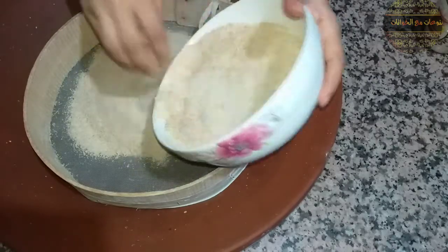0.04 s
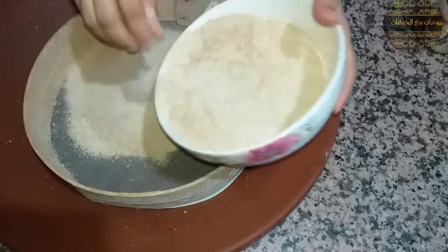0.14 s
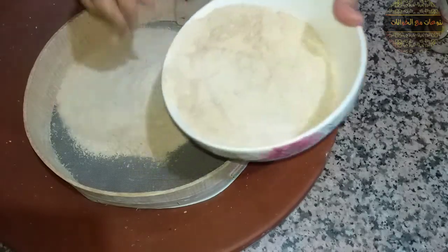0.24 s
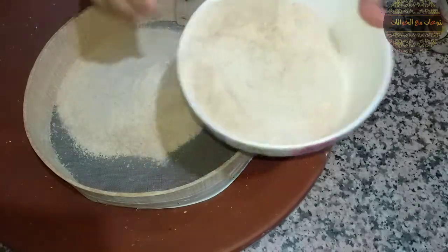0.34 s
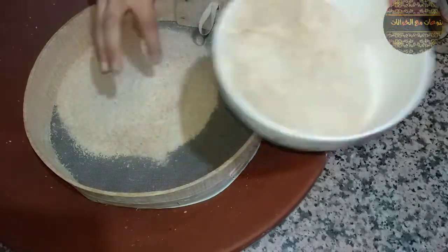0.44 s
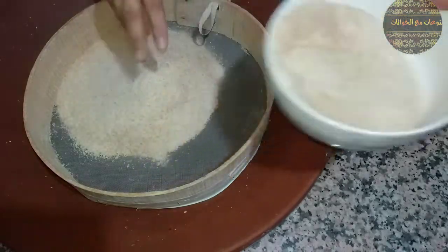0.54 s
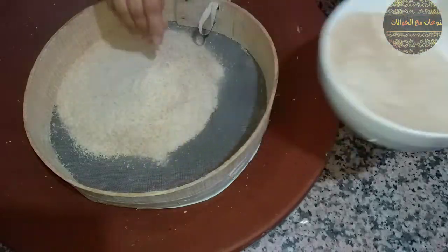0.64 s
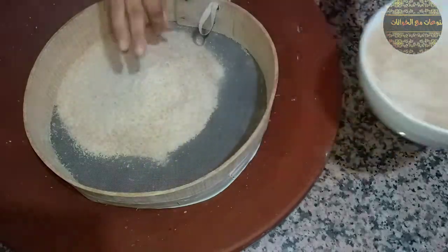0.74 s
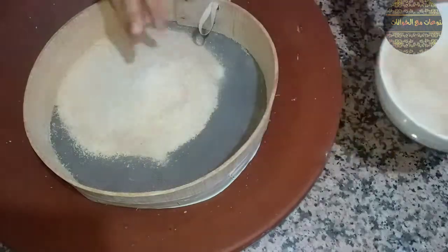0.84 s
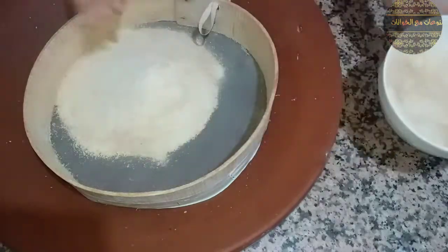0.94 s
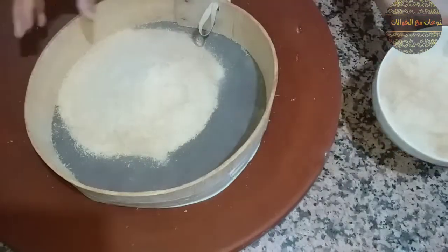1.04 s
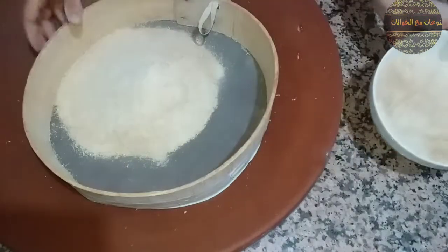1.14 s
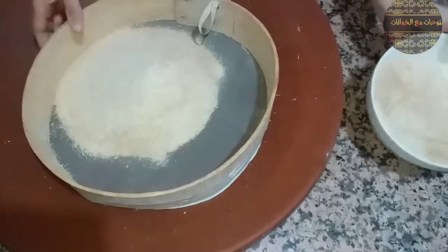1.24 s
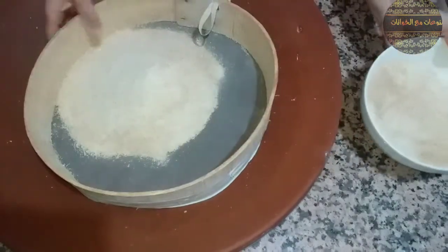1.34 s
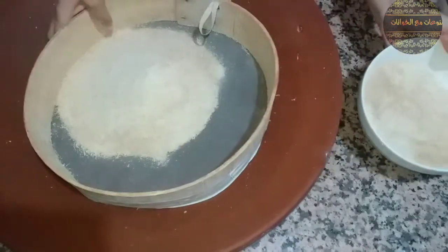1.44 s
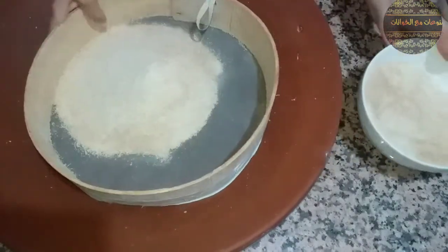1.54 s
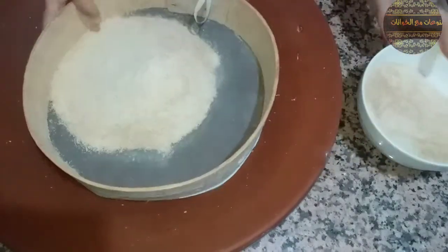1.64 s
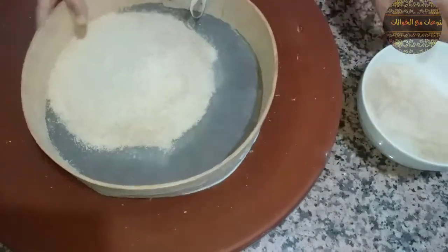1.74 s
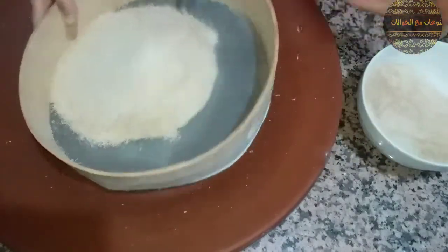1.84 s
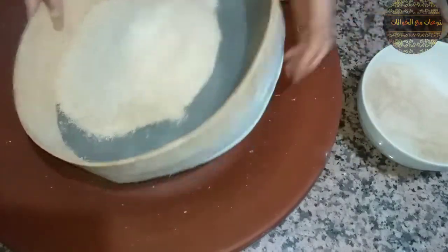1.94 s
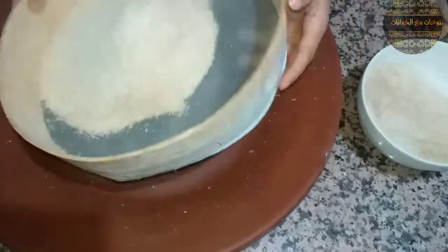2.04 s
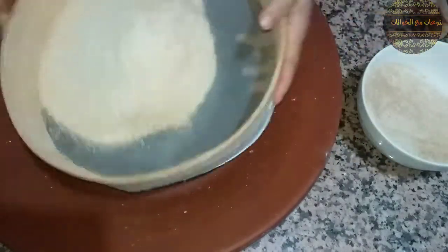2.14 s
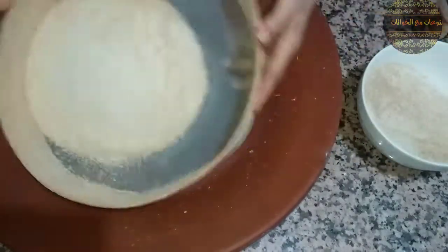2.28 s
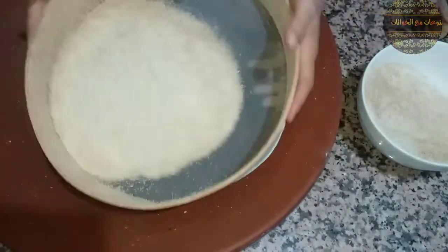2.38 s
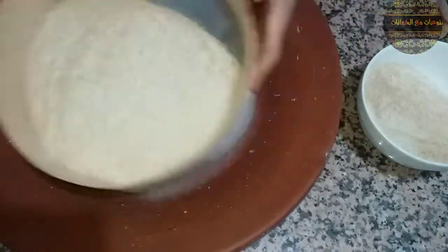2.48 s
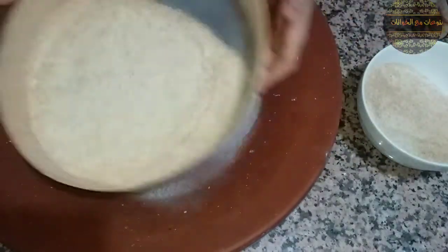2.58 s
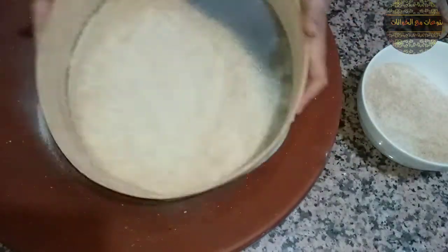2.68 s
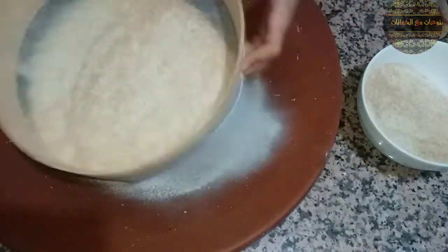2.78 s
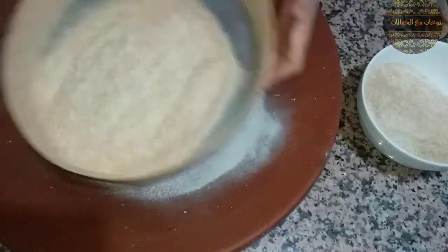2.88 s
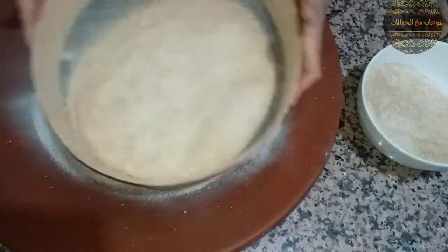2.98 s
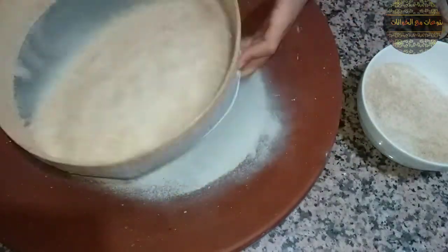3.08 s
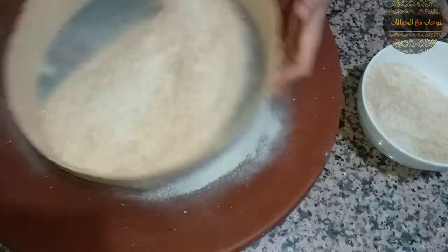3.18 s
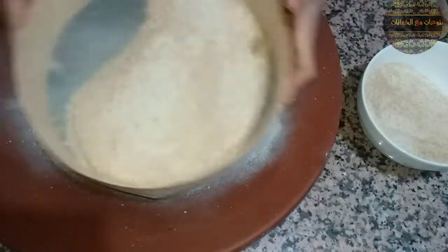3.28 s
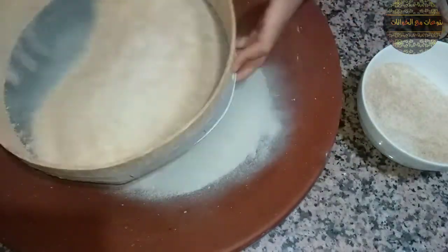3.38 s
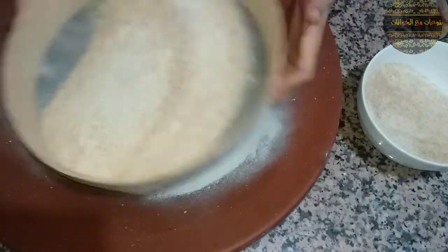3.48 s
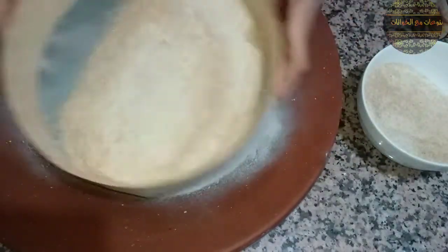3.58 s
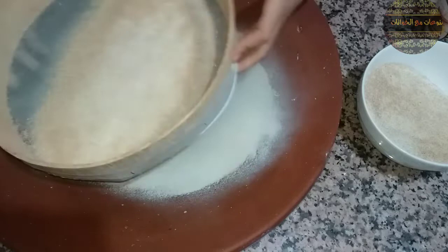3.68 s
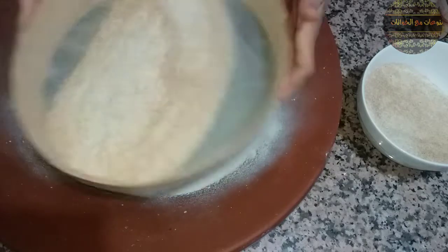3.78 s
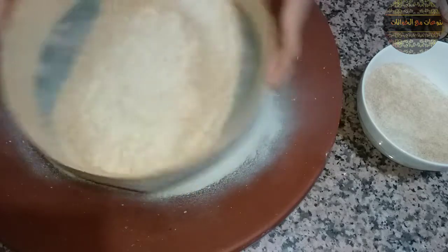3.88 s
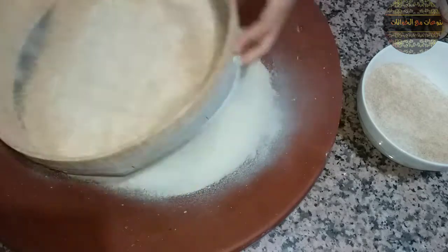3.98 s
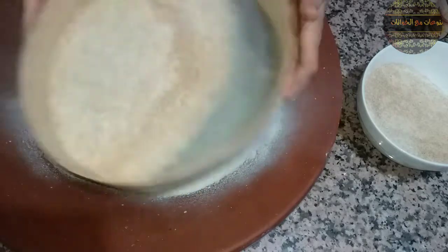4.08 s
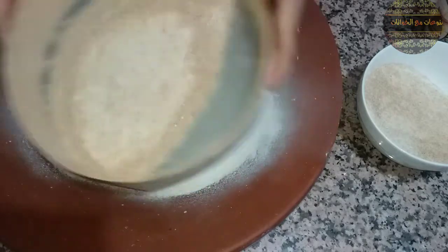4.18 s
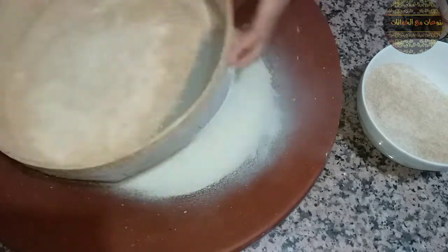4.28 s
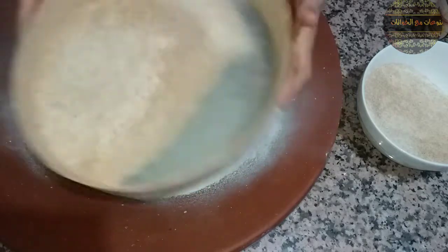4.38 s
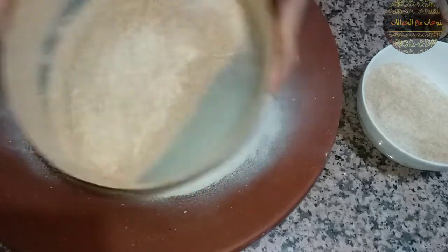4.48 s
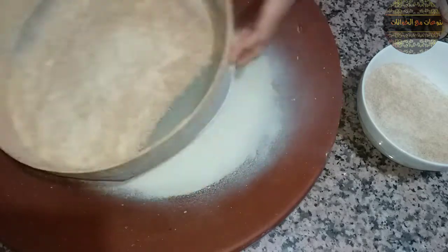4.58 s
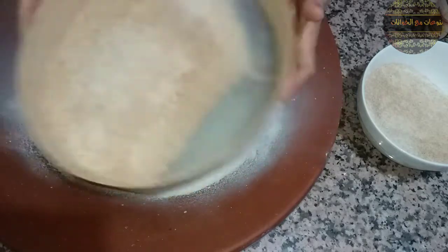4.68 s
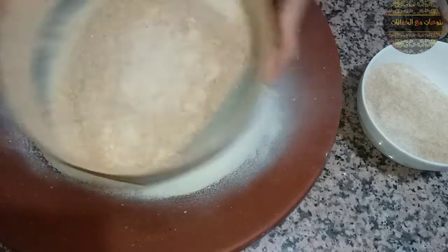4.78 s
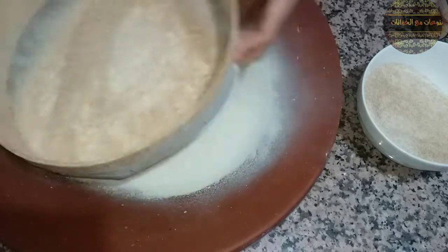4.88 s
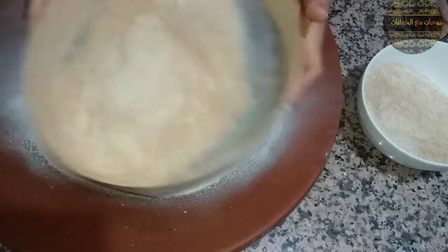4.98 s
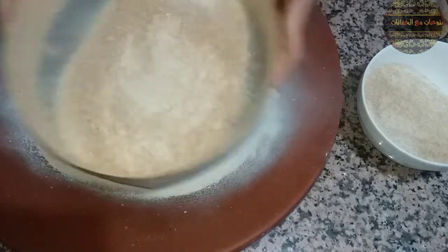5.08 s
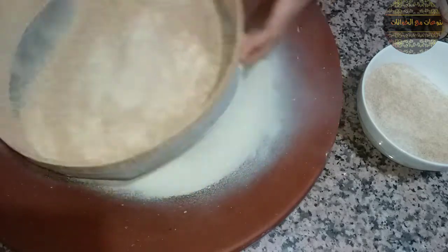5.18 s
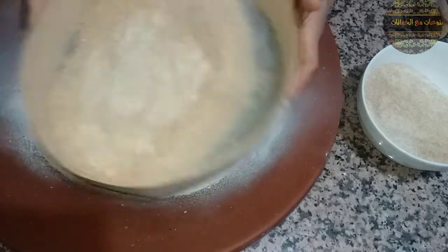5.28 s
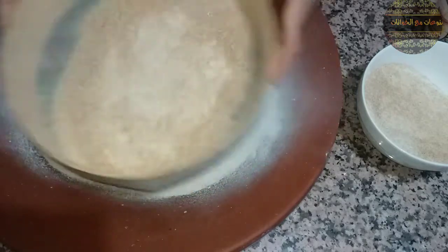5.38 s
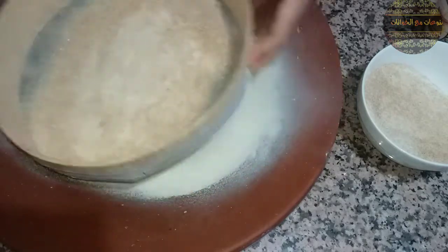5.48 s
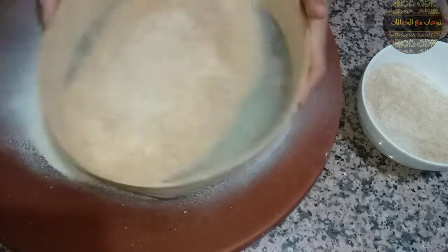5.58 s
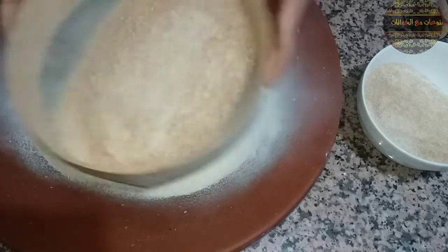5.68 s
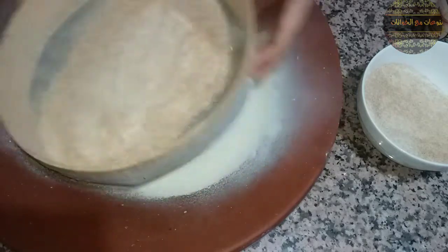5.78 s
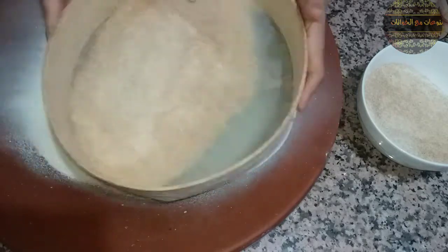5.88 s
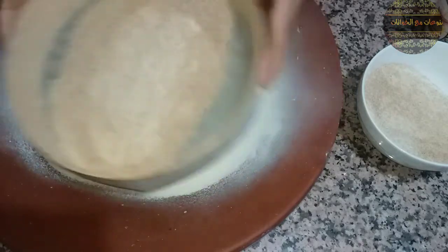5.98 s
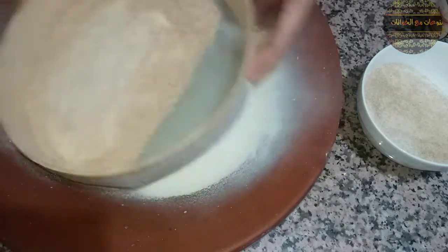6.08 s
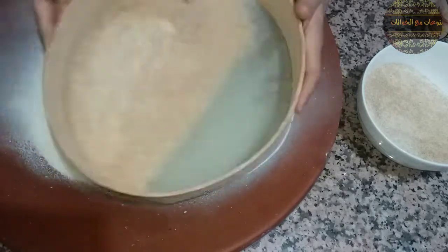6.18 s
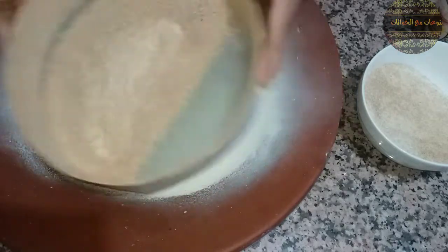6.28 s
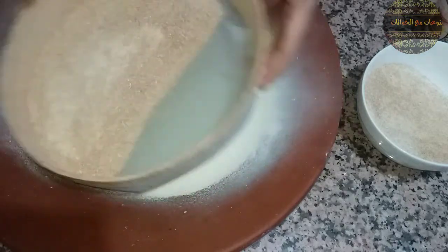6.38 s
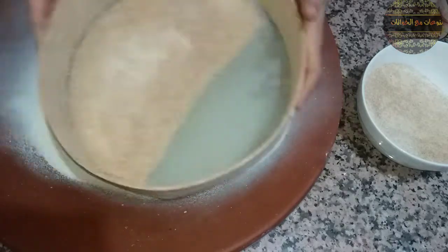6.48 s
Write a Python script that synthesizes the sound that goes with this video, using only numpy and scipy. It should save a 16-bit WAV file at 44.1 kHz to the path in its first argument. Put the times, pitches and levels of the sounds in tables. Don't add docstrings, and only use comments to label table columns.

```python
import sys
import numpy as np
from scipy import signal
from scipy.fft import rfft, irfft
from scipy.io import wavfile
from scipy.ndimage import uniform_filter1d

SR = 44100
rng = np.random.default_rng(int(sys.argv[2]) if len(sys.argv) > 2 else 0)


def wav_record(signal):
    frames = np.transpose(np.atleast_2d(signal))
    bounded = np.clip(frames, -1, 1)
    quanta = np.round(bounded * 32767).astype(np.int16)
    wavfile.write(sys.argv[1], SR, quanta)


def magnitude_from_level(level_db):
    exponent = np.asarray(level_db, float) / 20
    return 10 ** exponent


N = 287973
STEPS = np.arange(0, N + 32, 32) / SR

# start_s, mesh_crack_db, contact_ms, hoop_db, thump_db
SLAPS = [(2.2513, -27.5, 2.9, -55, -68), (2.553, -41.5, 6.3, -61, -57), (2.83, -37, 8.3, -47, -55),
         (3.1223, -29, 3, -44, -35.5), (3.4075, -26.5, 3.5, -37, -58), (3.7006, -26.5, 3.5, -41, -45.5),
         (3.9903, -26, 2.6, -34, -40.5), (4.2901, -32, 10.8, -44, -52), (4.592, -36, 11, -47.5, -54),
         (4.8851, -33.5, 7.7, -44.5, -50.5), (5.1901, -31.5, 6.4, -45, -56), (5.479, -34, 12.8, -48, -65),
         (5.7792, -37.5, 6.7, -48, -53), (6.0666, -33, 4.1, -42, -54), (6.3661, -31.5, 5.1, -46, -53)]
# start_s, mesh_crack_db,
# contact_ms, wood_db, dust_db
TOUCHES = [(0.4224, -59, 10, -80, -59), (0.6896, -60, 8.9, -78, -67), (0.805, -58, 8, -80, -79),
           (1.38, -48, 1.2, -63, -60), (1.9999, -50, 3.6, -47, -60), (2.084, -53, 8.8, -73, -55),
           (2.122, -53, 8.5, -69, -64), (2.6266, -42.5, 1.3, -66, -39.5), (2.981, -60, 7.5, -62, -61),
           (3.129, -49, 0.88, -48, -65), (5.2094, -63, 7, -48, -63), (5.308, -41.5, 3, -52, -47),
           (5.348, -46, 3.8, -54, -66), (5.631, -45, 3.1, -55, -56), (6.217, -38.5, 3, -56, -48),
           (6.492, -44, 5.5, -51, -66)]
# start_s, level_db, lasts_ms
FINGER_LANDINGS = [(2.2517, 0, 1.8), (2.553, -1, 4.2), (2.558, 3, 4.1), (2.8296, -4, 3.4), (2.8336, 2, 3.6),
                   (3.1227, 1, 1.9), (3.126, -4, 4.4), (3.4063, 0, 1.7), (3.4094, 0, 1.5), (3.7004, 3, 1.5),
                   (3.7026, -1, 1.5), (3.9886, -7, 1.9), (3.991, 1, 2.7), (4.289, 4.5, 3.5),
                   (4.2945, 3.5, 4), (4.587, -8, 1.3), (4.5909, -2.5, 3.7), (4.5947, -2, 3.1),
                   (4.8836, -2, 4.5), (4.8879, 2, 1.9), (4.8912, -4, 1.8), (5.188, -11, 4.4),
                   (5.192, -5, 3.1), (5.1943, -3, 1.5), (5.1988, -9, 1.4), (5.4795, -11, 1.3),
                   (5.479, -5, 3), (5.482, 0, 2.6), (5.777, -4, 4), (5.7821, 3, 3), (5.783, -6, 2.5),
                   (6.0656, -6, 5.3), (6.0722, 1, 3), (6.363, -11, 3), (6.367, -1, 4.5)]
# pitch_hz, density_db (per Hz)
CRACK_COLOUR = [(900, -21.5), (2300, -15), (2900, -5), (3900, -1), (6800, -0.5), (8300, -1.5), (9300, -32)]
HOOP_COLOUR = [(800, -36), (1300, -25.5), (1600, -9.5), (1950, -7), (2300, -3.5), (2800, -4), (3300, -38)]
THUMP_COLOUR = [(120, -25), (300, -1.5), (700, 4), (1300, -5), (2000, -17.5)]
DUST_COLOUR = [(7800, -52), (9200, -6), (11500, -2), (15500, -9), (17000, -22)]
# start_s, pitch_hz, level_db, t60_s
SIEVE_RINGS = [(2.2524, 7470, -20, 0.0089), (2.2535, 2100, -37, 0.028), (2.6268, 6000, -36, .004),
               (2.697, 2060, -44, 0.011), (2.831, 3300, -27.5, 0.01), (3.124, 2540, -28, 0.015),
               (3.13, 1260, -37, 0.02), (3.407, 2420, -27, 0.018), (3.4072, 3900, -28, 0.019),
               (3.1245, 5630, -22.5, 0.0094), (3.13, 1500, -38, 0.018), (3.416, 2130, -43, 0.048),
               (3.702, 2690, -37, .03), (3.7026, 4000, -22, 0.011), (3.9915, 3600, -25, 0.012),
               (3.993, 1370, -38, 0.0089), (3.992, 800, -33, 0.014), (3.715, 2100, -42, 0.033),
               (4.004, 2110, -35.5, 0.039), (4.885, 2300, -33.5, 0.023), (5.211, 220, -48, 0.096),
               (5.4835, 2270, -31.5, 0.02), (5.497, 2200, -47, 0.027), (5.779, 2300, -35.5, 0.015),
               (5.7818, 2360, -38, 0.013), (3.4245, 2320, -44, 0.018), (6.2184, 1680, -37, 0.02),
               (1.9992, 4470, -37.5, .012), (2.0022, 3350, -35.5, 0.009), (3.1235, 850, -41, 0.024),
              (3.126, 1620, -37, 0.022), (3.14, 830, -50, 0.051), (3.407, 590, -43.5, 0.029),
              (3.4075, 2220, -33, 0.025), (3.125, 2620, -34, 0.025), (3.9905, 2900, -28, .02),
              (3.991, 1520, -35, .015), (3.703, 520, -43, .02), (2.272, 2200, -50, .06),
              (3.128, 203, -45, 0.061), (3.42, 396, -46.5, .05), (5.4, 1000, -52, .05),
              (2.402, 1750, -50, .015), (2.0, 1350, -45, 0.017), (5.22, 830, -51, 0.056),
              (3.702, 1590, -38, .02), (3.7013, 1040, -41, .025), (3.72, 1200, -50, .04),
              (4.005, 2100, -49, 0.036), (4.5905, 1100, -44.5, .025), (5.19, 2250, -45, .015),
              (5.192, 2750, -41, .015), (5.21, 1400, -47, 0.037), (6.07, 740, -50, 0.023),
              (6.072, 1600, -48, .02), (6.2172, 2540, -38, .01), (2.852, 1120, -49, 0.065)]
# start_s, peak_db
TICKS = [(2.2614, -31), (3.4194, -42), (3.4244, -32), (3.7114, -42), (3.7194, -36), (3.836, -31),
         (4.1539, -28), (4.3033, -29), (4.316, -31), (5.5014, -42), (5.9194, -38), (1.224, -40),
         (1.241, -48), (1.3815, -39), (2.02, -42), (2.045, -44), (2.0925, -41), (2.135, -47), (2.155, -45),
         (5.896, -32)]

# pitch_hz, density_db (per Hz)
MESH_COLOUR = [(400, -56), (900, -12), (1500, -8), (2300, -4.5), (2800, -3), (3300, -0.5), (4000, 2),
               (5200, 1.5), (6500, -1.5), (7900, 2.5), (8600, -3), (9300, -7.5), (12000, -3.5),
               (15500, -7.5)]
# start_s, throw_db, throw_length_s, slide_back_db
STROKES = [(2.242, -48.5, 0.05, -74), (2.569, -69, 0.032, -52.5), (2.833, -64, 0.078, -48),
           (3.104, -52.5, 0.13, -52.5), (3.407, -50.5, 0.11, -50.5), (3.694, -47.5, 0.11, -56),
           (4, -46.5, 0.096, -49.5), (4.325, -50, 0.089, -49), (4.594, -50, 0.12, -49),
           (4.903, -51.5, 0.1, -53.5), (5.192, -51, 0.11, -52.5), (5.467, -52, 0.12, -50.5),
           (5.775, -48.5, 0.13, -53.5), (6.051, -50, 0.12, -52.5), (6.354, -51.5, 0.15, -52)]
# start_s, length_s, level_db, fizz_db, body_db
RUSTLES = [(0, .1, -68, 1, 0.1), (0.132, 0.09, -66, 6, 0), (.395, .045, -72, 2, -1),
           (0.67, 0.14, -64.5, 1.5, -5), (0.906, 0.042, -68, 2, -7), (1.212, 0.046, -57, -9, 7),
           (1.295, .03, -62, -12, 8), (1.348, 0.058, -52, -3, -2.5), (1.448, 0.058, -55, 6, -5),
           (1.528, 0.063, -54, -3, 3), (1.604, 0.068, -50.5, 3, -2), (1.648, 0.098, -51, -3, -1.5),
           (1.979, 0.057, -53.5, -4, -2), (2.06, 0.031, -63, -1, -3), (2.102, 0.053, -57.5, -2, -2)]
# time_s, level_db
TRICKLE = [(0, -68.5), (2.23, -68.5), (2.3, -57.5), (3.0, -54.5), (4.5, -51), (5.5, -53.5), (5.63, -57),
           (5.75, -55.5), (5.95, -61.5), (6.1, -51.5), (6.53, -59)]

# start_s, blow_db, ring_db, room_db, rebound_delay_ms
KNOCKS = [
    (1.2035, -16, -28, -17.5, 2.41),
    (1.6352, -23, -18, -11, 3.5),
    (2.3072, -27.5, -28.5, -28.5, 2.54),
]
# pitch_hz, density_db (per Hz)
BLOW_COLOURS = [
    [(29, -12), (50, -23), (174, -2.5), (380, -0.5), (520, 3), (891, 0), (1130, -2), (1700, -10.5),
     (2620, -35.5), (3420, -27), (4340, -37), (8300, -34), (15500, -88)],
    [(29, -57), (50, -27), (216, -6), (349, -5.5), (1000, -2), (1340, -14), (1830, -12.5), (4140, -35),
     (4900, -22), (6380, -34), (7540, -18.5), (10600, -27), (15500, -33)],
    [(47, -5), (80, -9), (432, 0.5), (834, -18), (970, 4), (1090, -7), (1750, -9), (2140, -16), (4500, -18),
     (5850, -60), (9900, -120)],
]
# pitch_hz, level_db, t60_s
LOW_MODES = [
    [(131.8, -1, 0.56), (206, 2.5, 0.32), (253, -1.5, 0.34), (315, -3, 0.45), (340, -10, 0.25),
     (380, -20, .2), (422, -12, 0.091), (459, 3, 0.2), (509, -12, 0.25), (584, -1.5, 0.31), (759, -12, 0.3),
     (785, -11, 0.24), (863, -10, .22), (920, -17, .2)],
    [(132, -5, 0.28), (112, -16, 0.27), (211, 2, 0.2), (246, -16, .2), (308, -15.5, 0.52), (461, -6, 0.21),
     (492, 3, 0.074), (609, -2.5, 0.18), (650, -13, 0.25), (723, -11, 0.48), (800, -7, 0.25),
     (824, -9, 0.53), (864, -12, .4), (870, -6.5, 0.3)],
    [(220, -10.5, 0.31), (310, -15, 0.17), (440, -10, 0.11), (498, -12, 0.22), (654, -10, 0.13),
     (975, -3.5, 0.14), (1032, -0.5, 0.068), (1520, -19, .15)],
]
# pitch_hz, level_db, t60_s
HIGH_MODES = [
    [(1030, -23, 0.27), (1050, -8, .25), (1100, 7.5, 0.14), (1170, -11, 0.23), (1217, -9, 0.28),
     (1390, -3.5, 0.3), (1545, -9, 0.29), (1470, -15, 0.27), (1720, -18, .2), (1850, -9, .12),
     (2170, -18, .1), (3270, -35, .09), (4900, -20, 0.078), (6360, -37, .06), (7660, -40, .07),
     (8100, -37, .07)],
    [(987, -12, .15), (1050, -6, 0.22), (1124, -3.5, 0.17), (1230, -33, 0.18), (1390, -10, 0.19),
     (1610, -27, 0.16), (1576, -8.5, 0.22), (1700, -24, .3), (1850, -30, .2), (2124, -18, .18),
     (2300, -27, .2)],
    [(1160, -16, .08), (1300, -15, 0.13), (1420, -15, .1), (1600, -18, 0.054), (1780, -11, .03),
     (2870, -28, .015)],
]
REBOUNDS = [0.33, 0.1, 0.34]
# delay_s after the knock, lost_db from the ring
DAMPING = [(.3, 0), (0.15, -15), (.3, 0)]
RING_STARTS = [0.61, 0.54, 0.78]
# start_s, level_db
CLICKS = [
    (1.63655, -2.5),
    (1.6497, -19),
]
# pitch_hz, level_db, t60_s
GLAZE_MODES = [(1610, 7.5, 0.0016), (2100, -23.5, 0.035), (2880, -27, 0.019), (5180, -33, 0.025),
               (7720, -21.5, 0.035), (9200, -28, 0.03), (10100, -35, 0.043), (8040, -35, .06),
               (11700, -25.5, 0.03), (13600, -30, 0.017), (15000, -35, .04)]
# start_s, length_s, level_db
DRAGS = [
    (1.443, .05, -65),
    (1.55, .04, -57),
    (1.6, 0.033, -61),
    (2.397, 0.0074, -56.5),
]
# pitch_hz, density_db (per Hz)
DRAG_COLOUR = [(400, -24), (750, 5), (1200, 2), (1900, -7), (2600, -12.5), (3500, -42)]

# pitch_hz, t60_s
KITCHEN_DECAY = [(80, 0.85), (200, 0.42), (500, 0.29), (800, 0.33), (1200, 0.3), (2500, 0.28), (6000, 0.19),
                 (12000, 0.16)]
# pitch_hz, density_db (per Hz)
AIR_COLOUR = [(18, -45), (30, -16), (120, 0), (270, -3), (443, -1), (787, -16), (1080, -21), (1360, -15),
              (1770, -15), (2490, -26), (3230, -17), (5310, -59), (6370, -15.5), (9190, -32.5),
              (15500, -58)]
# time_s, level_db
DRONE_DRIFT = [(0, -60), (1.1, -60.5), (1.6, -57), (1.95, -59), (2.2, -61.5), (2.45, -61), (2.7, -61.5),
               (3.25, -58), (3.6, -58.5), (4.1, -59), (4.6, -61), (5.0, -58.5), (5.7, -59), (6.53, -57.5)]
# pitch_hz, width_hz, level_db
DRONE_MODES = [(141, 26, -65), (454, 11, -66.5), (1087, 54, -69), (61.4, 16, -64), (1792, 91, -70),
               (6370, 76, -70.5)]
# time_s, level_db
WHINE_FADE = [(0, -1), (.6, 2), (1.0, 0.5), (1.7, -4), (1.85, -12), (6.53, -8)]
# time_s, low_hz, high_hz, level_db
UNLIKE_BANDS = [(.64, 6900, 8300, -76), (2.44, 5070, 6900, -68), (2.44, 9600, 11000, -73),
                (2.49, 6900, 8300, -65), (2.65, 13000, 14600, -72), (3.33, 4250, 5240, -62),
                (3.47, 9600, 11000, -63), (3.63, 5500, 7000, -60), (3.63, 9000, 14500, -59),
                (3.91, 4500, 5800, -63), (4.21, 4170, 5800, -59), (4.56, 8300, 9600, -60),
                (6.31, 8850, 10300, -67)]


def slaps():
    out = np.zeros(N)
    size, lead_s, rise_ms = 1500, 0.008, 0.37
    t_ms = np.arange(size) * 1000 / SR
    parts = [colour(points) for points in (CRACK_COLOUR, HOOP_COLOUR, THUMP_COLOUR, DUST_COLOUR)]
    slap_times = [row[0] for row in SLAPS]
    touch_landings = [(s, 0, ms) for s, _, ms, *_ in TOUCHES]
    for s, crack_db, ms, *other_db in contacts():
        landings = FINGER_LANDINGS if s in slap_times else touch_landings
        contact = np.zeros(size)
        for at, db, lasts_ms in landings:
            if abs(at - s) >= 0.012:
                continue
            since_ms = t_ms - (at - s + lead_s) * 1000
            rise = np.clip(since_ms / rise_ms + 0.5, 0, 1)
            contact += magnitude_from_level(db) * rise / (1 + abs(since_ms / max(lasts_ms, 0.4)) ** 5.7)
        ragged = uniform_filter1d(rng.standard_normal(size), size=36)
        contact *= magnitude_from_level(1.9 * evened(ragged))
        for db, taps in zip([crack_db, *other_db], parts):
            burst = signal.fftconvolve(rng.standard_normal(size) * contact, taps)
            burst *= np.sqrt(max(ms, 0.5) * SR / 1000) / np.linalg.norm(burst)
            add(out, s - lead_s, magnitude_from_level(db - 0.92) * burst)
    return out


def contacts():
    palms = [(*row, row[1] - 9 + 0.49 * row[2]) for row in SLAPS]
    tips = [(s, db, ms, wood_db, wood_db - 1, dust_db) for s, db, ms, wood_db, dust_db in TOUCHES]
    return sorted(palms + tips)


def mesh_ticks():
    out, t = np.zeros(N), np.arange(120) / SR
    mesh = colour(MESH_COLOUR)
    for s, peak_db in TICKS:
        tick = np.convolve(rng.standard_normal(120) * np.exp(-t / 0.00078), mesh)
        add(out, s, magnitude_from_level(peak_db + 0.5) * tick / abs(tick).max())
    return out


def hoop_rings():
    out, rise_ms = np.zeros(N), 0.7
    t_ms = np.arange(6000) * 1000 / SR
    soft = np.sin(np.pi / 2 * np.minimum(t_ms / rise_ms, 1)) ** 2
    for s, hz, db, t60 in SIEVE_RINGS:
        modes = [(hz, db + 1.5, t60), (1.5 * hz, db - 24, 0.57 * t60)]
        add(out, s, soft * ringing(modes, size=6000))
    return out


def air_puffs():
    out = np.zeros(N)
    for s, crack_db, *_ in SLAPS[2:]:
        add(out, s, magnitude_from_level(crack_db - 13) * ringing([(63, -8, 0.13), (82.6, -8, 0.098)]))
    return out


def flour():
    level_db, fizz_db, body_db = flour_motion()
    lumps = evened(uniform_filter1d(rng.standard_normal(N), size=350))
    strength = magnitude_from_level(4.7 * np.minimum(rng.exponential(1, N), 5))
    struck = rng.random(N) < 1500 / SR
    coarse = strength * struck * rng.choice([-1, 1], N)
    grains = evened(signal.oaconvolve(coarse, colour(MESH_COLOUR))[:N])
    fine = hiss(MESH_COLOUR, patchy_db=1.0, top_db=fizz_db, body_db=body_db)
    return magnitude_from_level(level_db + 2.5) * (evened(fine) * magnitude_from_level(0.75 * lumps) + magnitude_from_level(-11) * grains)


def flour_motion():
    body_per_fizz = -1.3
    trickle_fizz_db, throw_fizz_db, back_fizz_db = -0.5, 1, 2.5
    back_after_s, back_early_s, last_stroke_s = 0.16, 0.023, 0.3
    trickle = magnitude_from_level(np.interp(STEPS, *np.transpose(TRICKLE))) ** 2
    slides = [(trickle, trickle_fizz_db, body_per_fizz * trickle_fizz_db)]
    for s, length, db, fizz_db, body_db in RUSTLES:
        rustle = slide_power(s, length, 0.024, 0.045, db, -0.5)
        slides.append((rustle, fizz_db, body_db))
    ends = [row[0] for row in STROKES[1:]] + [STROKES[-1][0] + last_stroke_s]
    for (s, throw_db, length, back_db), end in zip(STROKES, ends):
        throw = slide_power(s, length, 0.013, 0.048, throw_db, 1)
        slides.append((throw, throw_fizz_db, body_per_fizz * throw_fizz_db))
        back_s = s + back_after_s
        back = slide_power(back_s, end - back_early_s - back_s, 0.048, 0.031, back_db, 0)
        slides.append((back, back_fizz_db, body_per_fizz * back_fizz_db))
    power = sum(row[0] for row in slides)
    fizz = sum(row[0] * row[1] for row in slides) / power
    body = sum(row[0] * row[2] for row in slides) / power
    return spread(10 * np.log10(power)), spread(fizz), spread(body)


def slide_power(start, length, rise, fall, db, change_db):
    t = STEPS - start
    swell = np.clip(t / max(rise, 0.002), 0, 1)
    decay = np.exp(-np.maximum(t - length, 0) / max(fall, 0.002))
    drift_db = change_db * np.clip(t / max(length, 0.01), 0, 1)
    return (swell * decay * magnitude_from_level(db + drift_db)) ** 2


def hiss(points, patchy_db, top_db, body_db):
    frames, hz = N // 128 + 5, np.fft.rfftfreq(512, 1 / SR)
    real, imag, patches = rng.standard_normal((3, 257, frames))
    patches = uniform_filter1d(patches, size=8, axis=0)
    patches = evened(uniform_filter1d(patches, size=14, axis=1))
    at = np.minimum(np.arange(frames) * 128, N - 1)
    top = np.outer(np.clip((hz - 8000) / 1500, 0, 1), top_db[at])
    body = np.outer(np.clip((3400 - hz) / 700, 0, 1), body_db[at])
    gain = magnitude_from_level(read(points, hz)[:, None] + patchy_db * patches + top + body)
    return signal.istft((real + 1j * imag) * gain, nperseg=512, noverlap=384)[1][:N]


def knocks():
    out, t = np.zeros(N), np.arange(SR // 2) / SR
    rows = zip(KNOCKS, BLOW_COLOURS, LOW_MODES, HIGH_MODES, REBOUNDS, DAMPING, RING_STARTS)
    for knock, spectrum, low, high, rebound, (damped_s, lost_db), start in rows:
        s, blow_db, ring_db, room_db, delay_ms = knock
        contact = np.zeros(300)
        contact[0] = -1
        contact[round(np.clip(delay_ms, 0.1, 6) * SR / 1000)] = -rebound
        blow = magnitude_from_level(blow_db + 23.5) * np.convolve(contact, colour(spectrum))
        modes = low + high
        ring = ringing(modes[::2]) - ringing(modes[1::2])
        build_up = np.minimum(start + t / 0.031, 1)
        hand_db = lost_db * np.clip((t - damped_s) / 0.012, 0, 1)
        add(out, s, blow)
        add(out, s, magnitude_from_level(ring_db + hand_db) * build_up * ring)
        add(out, s, magnitude_from_level(room_db + 18) * signal.fftconvolve(blow, kitchen()))
    return out


def clicks():
    out = np.zeros(N)
    for s, db in CLICKS:
        add(out, s, -magnitude_from_level(db) * ringing(GLAZE_MODES))
    return out


def drags():
    roughness = evened(uniform_filter1d(rng.standard_normal(N), size=150))
    grit = rng.standard_normal(N) * magnitude_from_level(2.2 * roughness)
    power = sum(slide_power(s, length, 0.012, 0.015, db, 0) for s, length, db in DRAGS)
    return spread(np.sqrt(power)) * evened(signal.oaconvolve(grit, colour(DRAG_COLOUR))[:N])


def kitchen():
    taps = np.zeros(SR)
    at = np.arange(120, SR - 16, 16)
    taps[at + rng.integers(0, 16, at.shape)] = rng.choice([-1., 1.], at.shape)
    hz, t, z = signal.stft(taps, SR, nperseg=512)
    fade_db = -60 * t / read(KITCHEN_DECAY, hz)[:, None]
    next_room = magnitude_from_level(-20.5 + fade_db / 2.28)
    tail = signal.istft(z * (magnitude_from_level(fade_db) + next_room), SR, nperseg=512)[1]
    return tail / np.linalg.norm(tail)


def appliance():
    time, hz = np.arange(N) / SR, np.fft.rfftfreq(N, 1 / SR)
    air = irfft(rfft(rng.standard_normal(N)) * magnitude_from_level(read(AIR_COLOUR, hz)), N)
    out = magnitude_from_level(-58.5) * evened(air)
    whine_db = np.interp(time, *np.transpose(WHINE_FADE))
    for f, width, db in DRONE_MODES:
        noise = rng.standard_normal(N)
        slow = uniform_filter1d(uniform_filter1d(noise, size=5000), size=5000)
        fade_db = whine_db * (f > 5000)
        band = irfft(rfft(noise) / (1 + ((hz - f) / width) ** 2), N)
        out = out + magnitude_from_level(db + 1.9 * evened(slow) + fade_db) * evened(band)
    return out * magnitude_from_level(np.interp(time, *np.transpose(DRONE_DRIFT)) + 59)


def channel_difference(mono):
    highpass = signal.butter(8, 8600, "highpass", fs=SR, output="sos")
    treble, noise_treble = signal.sosfilt(highpass, [mono, rng.standard_normal(N)])
    quiet = uniform_filter1d(treble ** 2, size=1024) < magnitude_from_level(-70) ** 2
    side = magnitude_from_level(-79) * noise_treble * quiet
    hz = np.fft.rfftfreq(2048, 1 / SR)
    for s, low_hz, high_hz, db in UNLIKE_BANDS:
        inside = (hz > low_hz) * (hz < high_hz)
        band = evened(irfft(rfft(rng.standard_normal(2048)) * inside))
        add(side, s - 1024 / SR, magnitude_from_level(db) * band * signal.windows.tukey(2048, 0.6))
    return side


def ringing(modes, size=SR // 2):
    t = np.arange(size) / SR
    out = np.zeros(size)
    for hz, db, t60 in modes:
        out += magnitude_from_level(db - 60 * t / np.clip(t60, 0.002, 0.7)) * np.sin(2 * np.pi * hz * t)
    return out


def colour(points):
    db = read(points, abs(np.fft.fftfreq(4096, 1 / SR)))
    log_gain = np.log(magnitude_from_level(np.maximum(db, -100)))
    phase = -signal.hilbert(log_gain).imag
    taps = np.fft.ifft(np.exp(log_gain + 1j * phase)).real[:2048]
    return taps / np.linalg.norm(taps)


def read(points, hz):
    f, value = np.transpose(points)
    return np.interp(np.log(hz + 1), np.log(f + 1), value)


def evened(x):
    return x / np.sqrt(np.mean(x ** 2) + 1e-20)


def spread(control):
    return np.interp(np.arange(N) / SR, STEPS, control)


def add(mix, s, sound):
    part = mix[round(s * SR):][:len(sound)]
    part += sound[:len(part)]


def scene():
    near = slaps() + clicks() + mesh_ticks() + hoop_rings() + air_puffs()
    room = magnitude_from_level(-7) * signal.fftconvolve(near, kitchen())[:N]
    mono = near + room + flour() + knocks() + drags() + appliance()
    return np.array([mono, mono])


def top_cut(x):
    return signal.sosfilt(signal.butter(12, 16800, fs=SR, output="sos"), x)


def record(dry):
    mono = signal.sosfilt(signal.butter(3, 90, "highpass", fs=SR, output="sos"), dry[0])
    mono = np.clip(mono, -0.95, 0.95)
    side = channel_difference(mono)
    band_limit = signal.firwin(601, 15550, fs=SR)
    pair = signal.oaconvolve([mono + side, mono - side], band_limit[None], "same")
    return top_cut(pair)


dry = scene()
out = record(dry)
wav_record(out)
```